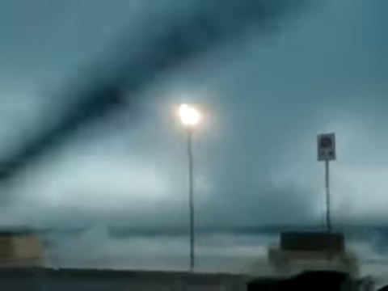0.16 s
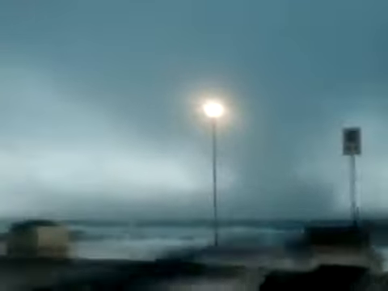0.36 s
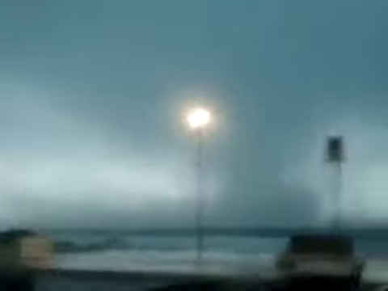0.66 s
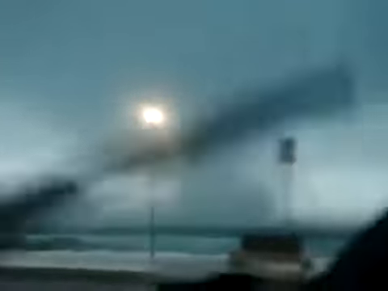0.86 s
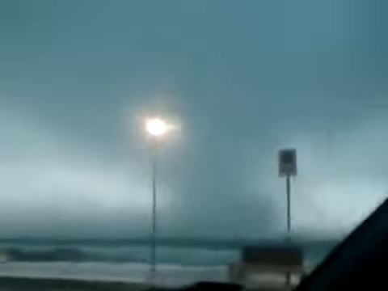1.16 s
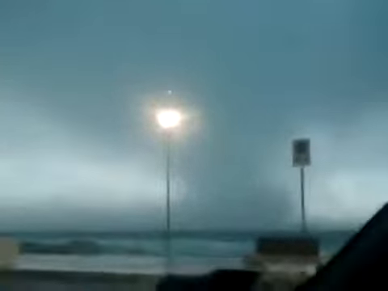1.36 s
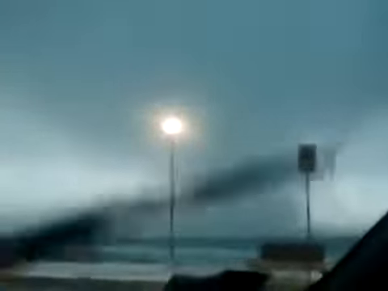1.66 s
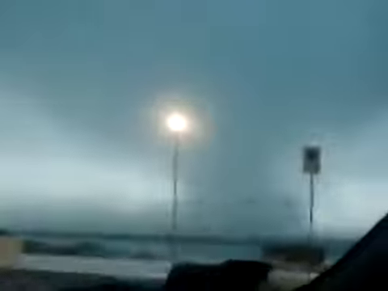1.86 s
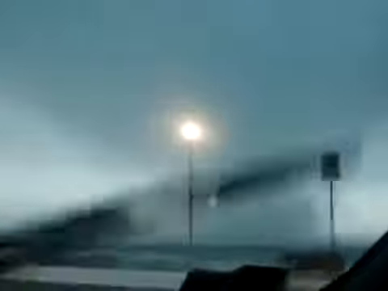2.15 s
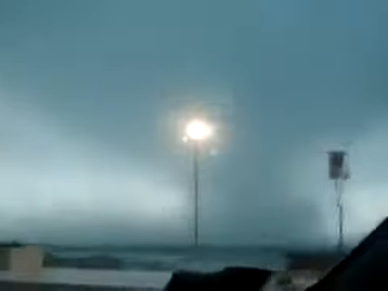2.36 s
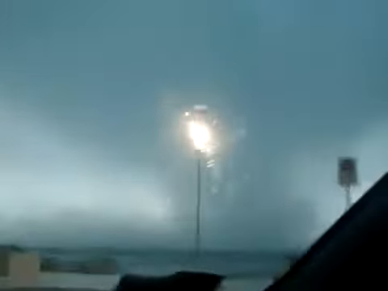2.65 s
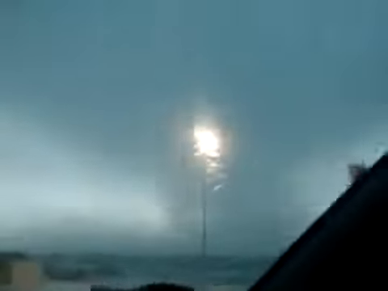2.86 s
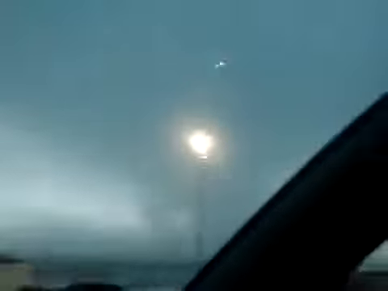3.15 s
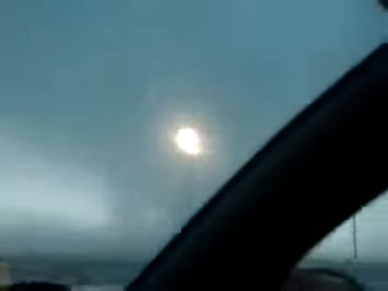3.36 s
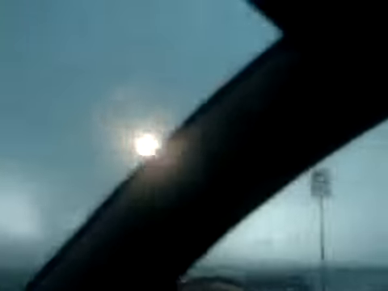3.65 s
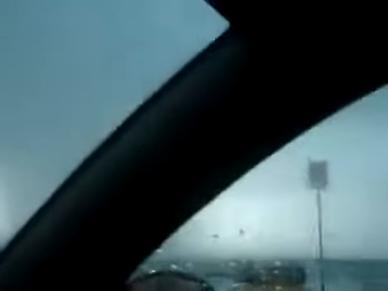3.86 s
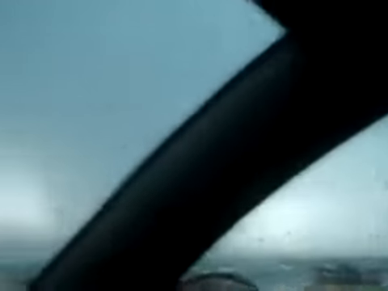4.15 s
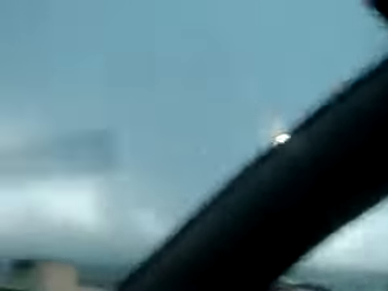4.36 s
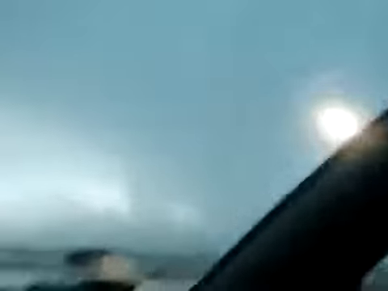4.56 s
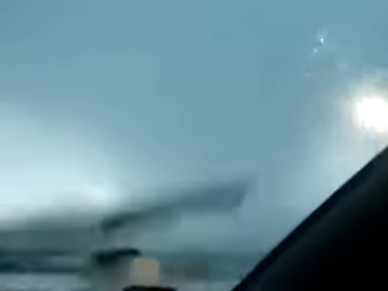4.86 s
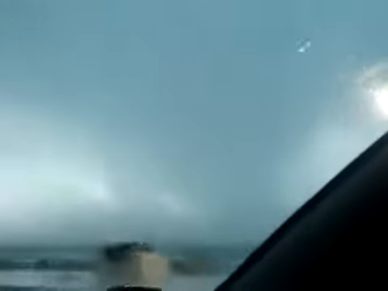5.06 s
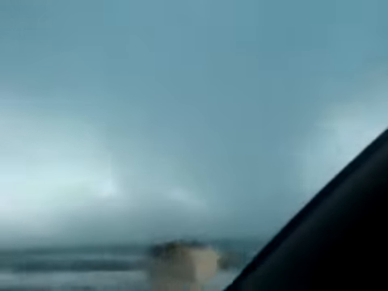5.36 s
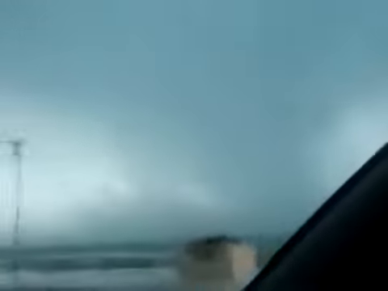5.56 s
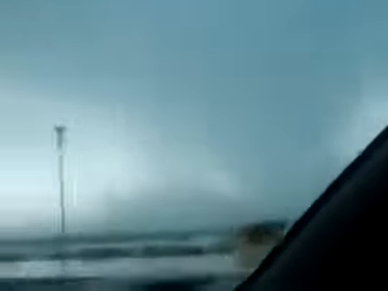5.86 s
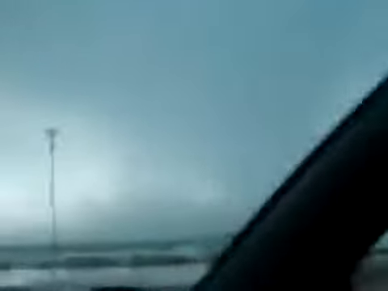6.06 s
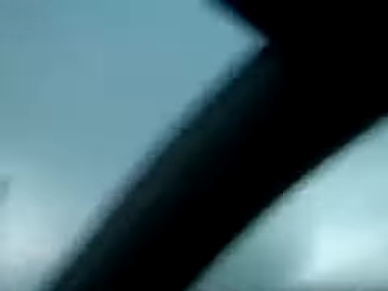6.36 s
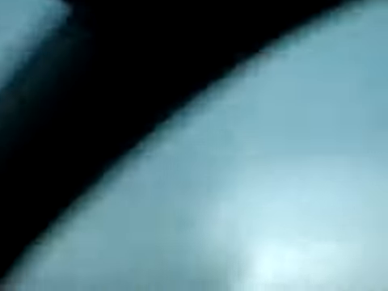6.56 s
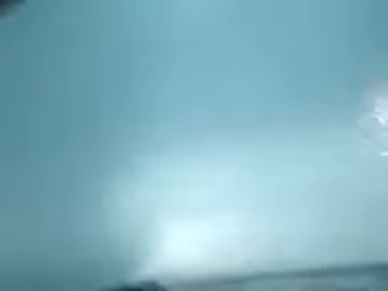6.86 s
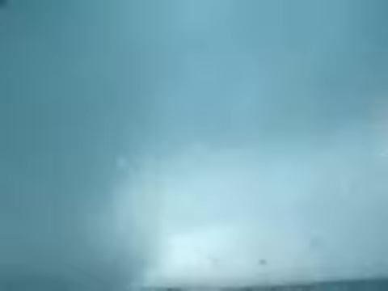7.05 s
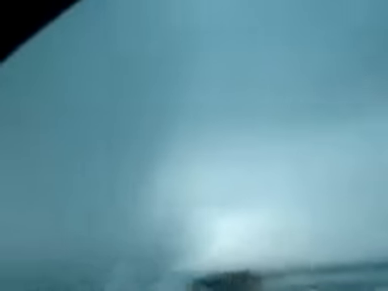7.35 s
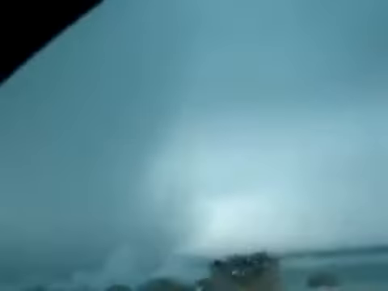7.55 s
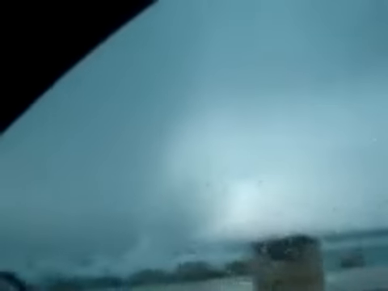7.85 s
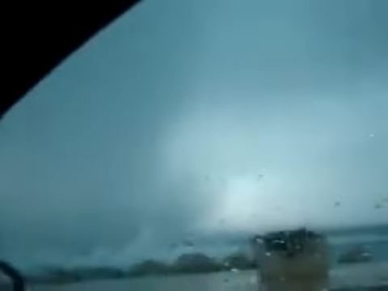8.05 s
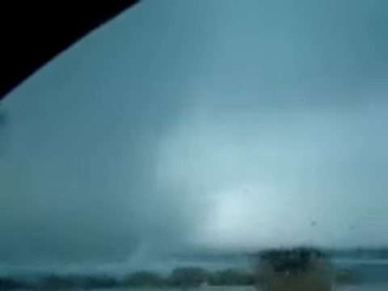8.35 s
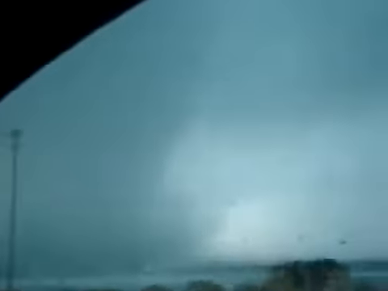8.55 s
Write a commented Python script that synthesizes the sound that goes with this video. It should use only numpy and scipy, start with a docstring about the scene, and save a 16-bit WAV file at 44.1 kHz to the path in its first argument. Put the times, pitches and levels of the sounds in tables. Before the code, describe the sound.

Heard from inside a car by the stormy sea: rain roars on the roof with a hollow, boomy cabin ring. Big drops smack the glass irregularly, and wipers thud at each turn, louder at the bottom. Around the middle, gusts hurl crackling spray and the engine faintly revs, then settles to idle as the spray eases.

```python
"""Inside a car in a storm, dense rain drums on the roof and rings the cabin: shaped noise from random drops,
passed through resonances. Gusts throw crackling spray and big drops, short two-band noise bursts, against
the glass. The wipers thud at each turn, as struck resonances. The engine idles and revs once, as two
gliding sines, under a steady hum."""
import sys
import numpy as np
from scipy import signal
from scipy.fft import rfft, irfft
from scipy.io import wavfile
from scipy.ndimage import uniform_filter1d

SR = 44100
rng = np.random.default_rng(int(sys.argv[2]) if len(sys.argv) > 2 else 0)


def decibels_to_gain(level_db):
    """Convert a level in decibels to a linear amplitude gain (20 dB per decade)."""
    exponent = np.asarray(level_db, float) / 20
    return 10 ** exponent


def wav_record(signal):
    """Record a signal, one row per channel, as 16-bit PCM in the file named by sys.argv[1]."""
    frames = np.transpose(np.atleast_2d(signal))
    bounded = np.clip(frames, -1, 1)
    # unit amplitude maps onto the largest positive 16-bit level
    quanta = np.round(bounded * 32767).astype(np.int16)
    wavfile.write(sys.argv[1], SR, quanta)


N = 383669
TIME = np.arange(N) / SR


def level(x, db):
    """Root-mean-square scaling to a level in dB."""
    return x * decibels_to_gain(db) / np.sqrt(np.mean(x ** 2))


def colour(x, points):
    """Minimum-phase filtering: a folded cepstrum gives a causal filter whose gain follows (Hz, dB) points."""
    hz, db = np.transpose(points)
    grid = np.linspace(1, SR / 2, 2049)
    log_gain = np.interp(np.log(grid), np.log(hz), db) * np.log(10) / 20
    cepstrum = irfft(log_gain)
    cepstrum[1:2048] *= 2
    cepstrum[2049:] = 0
    impulse = irfft(np.exp(rfft(cepstrum)))
    return signal.fftconvolve(x, impulse)[:len(x)]


def ring(x, modes):
    """Modal superposition: a sum of resonances (Hz, width Hz, gain dB at the centre)."""
    return sum(decibels_to_gain(db) * signal.lfilter(*signal.iirpeak(hz, hz / width, SR), x) for hz, width, db in modes)


def split(x, hz):
    """Crossover filtering: lows and highs either side of one frequency."""
    return [signal.sosfilt(signal.butter(2, hz, kind, fs=SR, output="sos"), x) for kind in ("low", "high")]


def walk(rate):
    """Random modulation: levels held 1 / rate s and slewed twice, with a spread near 1."""
    k = int(SR / rate)
    steps = np.repeat(rng.standard_normal(N // k + 1), k)
    return 1.3 * uniform_filter1d(uniform_filter1d(steps, k), k)[:N]


def patter(rate, scatter_db, t60, biggest=4):
    """Shot noise: drops land at random, a few larger, each a burst of noise that decays 60 dB in t60 s."""
    lands = rng.random(N) < rate / SR
    size = np.minimum(rng.exponential(size=N), biggest)  # drops break up beyond a size
    power = lands * decibels_to_gain(scatter_db * size) ** 2
    decay = np.exp(-2 * np.log(1000) / (t60 * SR))
    power = signal.lfilter([1], [1, -decay], power)
    return np.sqrt(power) * rng.standard_normal(N)


# Engine speed through one rev. Each row: time in seconds, firing rate in Hz.
ENGINE_SPEED = [(0.0, 30.68), (3.5, 31.38), (5.01, 44.2), (5.4, 49.85), (5.77, 47.6), (6.4, 33.7),
                (6.93, 30.3), (8.7, 30.2)]
IDLE_DB, COAST_DB, OCTAVE_DB = -59.5, -61, -57.5
LOAD_DB_PER_HZ, LIFT_S = 1.0, 5.15  # gain with speed while the throttle is open; when it closes
HUM_HZ, HUM_DB = 60.3, -48.5


def engine():
    """Periodic excitation: firing tone and octave come through the floor; a faint hum of fixed pitch wavers."""
    hz = np.interp(TIME, *np.transpose(ENGINE_SPEED))
    db = np.where(TIME < LIFT_S, IDLE_DB + LOAD_DB_PER_HZ * (hz - hz[0]), COAST_DB)
    db = uniform_filter1d(db, size=SR // 8) + 2.5 * walk(2.6)
    phase = 2 * np.pi * np.cumsum(hz) / SR
    firing = decibels_to_gain(db) * np.sin(phase) + decibels_to_gain(OCTAVE_DB) * np.sin(2 * phase)
    hum = decibels_to_gain(HUM_DB + 0.7 * walk(1.5)) * np.sin(2 * np.pi * HUM_HZ * TIME)
    return np.sqrt(2) * (firing + hum)  # sine levels are rms


# Resonances of the cowl. Each row: frequency in Hz, width in Hz, relative gain in dB.
COWL = [(162.5, 20, -2), (420, 34, 8.5), (780, 430, -4)]
# Successive landings of the blades at rest. Each entry: peak level of a single thud in dB.
REST_DB = [-11.5, -9, -14, -11.5, -9.5, -12, -9]
TOP_DB = -17  # every turn at the top
START_S, CYCLE_S, UP_S = 0.042, 1.362, 0.687  # first landing at rest, up and down, rest to top turn


def wipers():
    """Impact excitation: reversing blades strike a soft blow and rebound through the cowl, harder at rest."""
    push = np.zeros(SR // 4)
    push[[0, int(0.006 * SR)]] = decibels_to_gain(0.5), 1  # blow, then rebound 6 ms later
    contact = np.hanning(int(0.00089 * SR))
    thud = ring(np.convolve(push, contact)[:len(push)], COWL)
    blows = np.zeros(N + SR)
    rest_s = START_S + CYCLE_S * np.arange(len(REST_DB))
    blows[(rest_s * SR).astype(int)] = decibels_to_gain(np.array(REST_DB))
    blows[((rest_s + UP_S) * SR).astype(int)] = decibels_to_gain(TOP_DB)
    return signal.fftconvolve(blows, thud / np.abs(thud).max())[:N]


# The biggest drops on the glass. Each row: start in seconds, level in dB, initial treble in dB above that level.
BIG_DROPS = [(0.0237, -20, -12), (0.0417, -30, -12), (0.07, -24.5, -12), (0.0901, -45, 0),
             (0.151, -27.5, -10), (0.2378, -34, -2), (0.248, -20.5, -9), (0.532, -30, -13),
             (0.574, -28, -22), (0.589, -29.5, -20), (0.6987, -21.5, -10), (0.7544, -22.5, -10),
             (0.7773, -26, -16), (0.822, -32, -16), (0.8524, -26.5, -26), (0.9025, -36, -7),
             (0.9274, -26, -8), (0.949, -24.5, -9), (1.048, -35, -13), (1.0983, -25, -33),
             (1.165, -28, -22), (1.225, -27.5, -16), (1.245, -24, -12), (1.255, -26.5, -12),
             (1.2815, -27, -16), (1.339, -39, -13), (1.4163, -24, -10), (1.7605, -24.5, -19),
             (1.7897, -28, -14), (1.8203, -29, -13), (1.877, -32, -15), (2.1704, -27.5, -24),
             (2.3466, -27.5, -13), (2.4777, -28, -19), (2.5112, -29, -13), (2.538, -33, -9),
             (2.6159, -26, -16), (2.703, -27.5, 1.5), (2.841, -29.5, -15), (2.948, -28.5, -18),
             (3.0819, -33, -18), (3.227, -30, -16), (3.2889, -30, -21), (3.3079, -33, -12),
             (3.3209, -27, -14), (3.408, -26, -10), (3.497, -31, -12), (3.5114, -34, 1), (3.546, -27.5, -7),
             (3.7594, -25, -24), (3.804, -29, -20), (3.8146, -25.5, -18), (3.8663, -26, -25),
             (3.92, -26.5, -28), (3.9724, -28, -13), (4.008, -29.5, -5), (4.119, -29, -14),
             (4.203, -30.5, -22), (4.4014, -28.5, -9), (4.4495, -20, -31), (4.53, -25.5, -17),
             (4.5523, -38, -16), (4.575, -27, -19), (4.5977, -31, -17), (4.6297, -24.5, -11),
             (4.6477, -22.5, -10), (4.673, -22.5, -11), (4.6864, -26, -8), (4.793, -23, -15),
             (4.81, -21.5, -16), (4.887, -32, -15), (4.98, -20, -16), (5.139, -26.5, -24),
             (5.191, -24.5, -13), (5.2608, -19, -14), (5.28, -22, -26), (5.3013, -18.5, -9),
             (5.335, -25.5, -2), (5.3715, -26, -12), (5.4555, -27, -14), (5.497, -17.5, -35),
             (5.5633, -24, -6), (5.613, -22.5, -8.0), (5.6288, -26, -13), (5.7084, -26, -10),
             (5.7703, -37, -16), (5.8466, -29, -19), (5.875, -28, -10), (5.915, -23, -20), (5.941, -23, -8),
             (5.9507, -19.5, -13), (6.003, -18, -10), (6.059, -23, -6.5), (6.083, -28, -6),
             (6.1476, -27, -14), (6.205, -25.5, -20), (6.2686, -18.5, -17), (6.311, -23, -11),
             (6.424, -27, -14), (6.535, -39, -15), (6.5747, -37, -11), (6.6014, -22, -19),
             (6.641, -25, -20), (6.7375, -21, -9), (6.7915, -25, -10), (7.0518, -26, -15),
             (7.0983, -27, -11), (7.5122, -19, -15), (7.5363, -28, -9), (7.7452, -24, -5),
             (7.752, -21.5, -10), (7.892, -30, -7), (7.9792, -26, -9), (8.046, -27, -10.0),
             (8.331, -29.5, -21)]
BODY_HZ, TREBLE_HZ = (2030, 4860), (4440, 7700)  # band edges
HOLD_S, T60_S = 0.0031, 0.034  # splash holds, then decays; T60 is that of a -28 dB drop
CRACKLE_PER_S, CRACKLE_DB = 1500.0, 2.5  # a splash breaks into uneven droplets
ONSET_DB, ONSET_S = 1, 0.001  # added at the first instant, which steepens the rise


def big_drops():
    """Transient decay: each drop strikes and splashes; bigger ones last longer, treble dies first."""
    t = np.arange(SR // 8) / SR
    noise, grain = rng.standard_normal((len(BIG_DROPS), 2, len(t))).transpose(1, 0, 2)
    k = int(SR / CRACKLE_PER_S)
    droplets = np.repeat(np.tanh(grain[:, ::k]), k, axis=1)[:, :len(t)]
    noise = noise * decibels_to_gain(CRACKLE_DB * droplets)
    body, treble = (level(signal.sosfilt(signal.butter(2, hz, "band", fs=SR, output="sos"), noise), 0)
                    for hz in (BODY_HZ, TREBLE_HZ))
    out = np.zeros(N + len(t))
    for (s, db, treble_db), low, high in zip(BIG_DROPS, body, treble):
        t60 = T60_S * decibels_to_gain(0.21 * (db + 28))
        spread = (1 - np.exp(-t / 0.001)) * decibels_to_gain(-60 * np.maximum(t - HOLD_S, 0) / t60)
        spread = spread * (1 + decibels_to_gain(ONSET_DB) * np.exp(-t / ONSET_S))
        # give every splash the same energy in each band before its own level
        low, high = (x * np.linalg.norm(spread) / np.linalg.norm(spread * x) for x in (low, high))
        splash = low + decibels_to_gain(treble_db - 35 * t / t60) * high
        out[int(s * SR):][:len(t)] += decibels_to_gain(db) * spread * splash
    return out[:N]


# Resonances of cabin and panels, rung by spray and by rain.
# Each row: frequency in Hz, width in Hz, relative gain in dB.
CABIN_MODES = [(359, 36, 8), (415.4, 21, 15.5), (550, 41, 13), (628, 64, 4.5), (731, 21, 12),
               (808, 10, -7.5), (985, 43, -5.5), (1250, 28, -21), (1395, 46, -23)]
# Wind-driven spray on the glass. Each row: time in seconds, gain in dB.
GUSTS = [(0.0, -30.5), (0.22, -42.5), (1.0, -38), (1.26, -37.5), (1.6, -41.5), (1.8, -37.5), (2.2, -37.5),
         (2.52, -31.5), (2.7, -35.5), (3.14, -44), (3.36, -33), (3.6, -35.5), (3.72, -35), (3.95, -34.5),
         (4.1, -32.5), (4.2, -38.5), (4.42, -35.5), (4.72, -32.5), (4.84, -23.5), (4.98, -28),
         (5.03, -32.5), (5.2, -37.5), (5.32, -28), (5.4, -24.5), (5.481, -23), (5.62, -24), (5.72, -32),
         (5.86, -33.5), (5.94, -25.5), (6.04, -25), (6.13, -28.5), (6.24, -32), (6.34, -27.5), (6.62, -27),
         (6.94, -34), (7.14, -33), (7.28, -39), (7.46, -40.5), (7.56, -33), (8.08, -31.5), (8.48, -43),
         (8.7, -34.5)]
# Colour of spray on glass. Each row: frequency in Hz, relative gain in dB.
GLASS_COLOUR = [(200, -9.5), (700, 11), (1500, 2.5), (2200, 2), (3400, 4.5), (5000, -6), (7000, -12.5),
                (10000, -27)]
# Bands of fine mist. Each entry: centre frequency in Hz.
MIST_BANDS = [5050, 6310, 8300]
FLUTTER_DB, FLUTTER_PER_S = 1.0, 20  # the spray comes in uneven handfuls
FLICKER_DB, FLICKER_PER_S = 2, 37  # each band of mist flickers alone


def spray():
    """Amplitude modulation: gusts swell crackling spray, flickering mist and ticks of middling drops."""
    s, gust_db = np.transpose(GUSTS)
    gust_db = np.interp(TIME, s, gust_db) + FLUTTER_DB * walk(FLUTTER_PER_S)
    coarse = level(split(patter(500.0, 2.4, 0.03, 3), 3000)[0], -3.5)
    fine = patter(300.0, 0.89, 0.028)
    mist = sum(ring(fine, [(hz, hz / 4, 0)]) * decibels_to_gain(FLICKER_DB * walk(FLICKER_PER_S)) for hz in MIST_BANDS)
    mist = level(split(mist, 3960)[1], 2.78)
    # in strong gusts the sheet of water swallows the single ticks
    ticks = level(patter(200.0, 3.5, 0.018, 2.5), 0) * decibels_to_gain(-0.15 * (gust_db - gust_db.mean()))
    on_glass = level(colour(coarse + mist + ticks, GLASS_COLOUR), 3.48)
    cabin = level(ring(patter(1800.0, 1.0, 0.02), CABIN_MODES), -16)  # gusts also ring the cabin
    return decibels_to_gain(gust_db) * (on_glass + cabin)


# Rain on the body. Each row: time in seconds, drumming gain in dB, cabin boom in dB above that gain.
RAIN_LEVELS = [(0.0, -25.5, -5), (0.8, -26.5, -2.5), (3.6, -27.5, -2.5), (4.0, -27, -8.5), (4.4, -27, -4.5),
               (4.85, -25, -3.5), (6.6, -25.5, -9), (6.8, -27, -12.5), (8.7, -27.5, -6)]
# Colour of drumming on the roof. Each row: frequency in Hz, relative gain in dB.
ROOF_COLOUR = [(20, -40.5), (80, -32.5), (200, -10), (500, -6.5), (850, -8), (1000, -12), (1500, -15.5),
               (1700, -22.5), (3000, -34), (6000, -50), (10000, -99)]
# Boom of the cabin air. Each row: frequency in Hz, width in Hz, relative gain in dB.
BOOM_MODES = [(240.6, 30, -1.2), (264.2, 17, 0.57)]
# Rumble of the floor. Each row: frequency in Hz, width in Hz, relative gain in dB.
FLOOR_MODES = [(107.3, 15, -2.5), (126.4, 45, -2.5), (149.5, 14, -4.5)]


def roof():
    """Resonance: countless drops merge into a roar; panels, cabin air and floor pick out their own notes."""
    s, *columns = np.transpose(RAIN_LEVELS)
    drum_db, boom_db = (np.interp(TIME, s, column) for column in columns)
    drops = patter(5000.0, 0.77, 0.011)
    drumming = level(colour(drops, ROOF_COLOUR), 0.17)
    notes = split(ring(patter(5000.0, 1.0, 0.013), CABIN_MODES), 150)[1]
    notes = level(notes, -2.5) * decibels_to_gain(0.28 * (boom_db - boom_db.mean()))  # partly follow the boom
    boom = ring(ring(patter(3400.0, 0.88, 0.021), BOOM_MODES), [(258, 200, 0)])
    boom = decibels_to_gain(boom_db) * level(boom, 0)
    rumble = ring(ring(patter(2800.0, 0.91, 0.019), FLOOR_MODES), [(137, 170, 0)])
    rumble = level(rumble, -14)
    return decibels_to_gain(drum_db) * (drumming + notes + boom + rumble)


def scene():
    """Linear superposition: all sources add at one microphone in the cabin."""
    return (roof() + spray() + big_drops() + wipers() + engine())[None]


def top_cut(x):
    """Nothing passes above the cut-off."""
    return signal.sosfilt(signal.butter(12, 11000, fs=SR, output="sos"), x)


def record(dry):
    """Band limiting: the camera cuts the top steeply with an elliptic low-pass at 10032 Hz."""
    cut = signal.sosfilt(signal.ellip(11, 0.3, 50, 10032, fs=SR, output="sos"), dry)
    return top_cut(cut)


dry = scene()
out = record(dry)
wav_record(out)
```